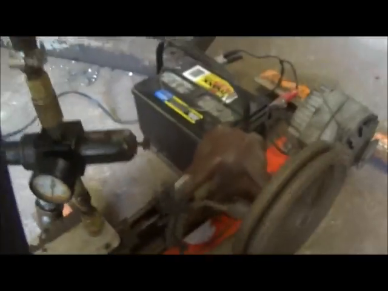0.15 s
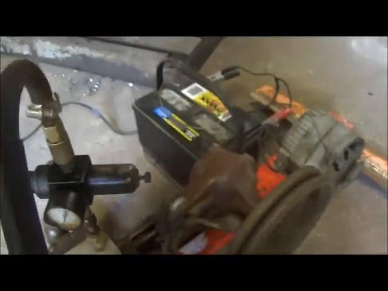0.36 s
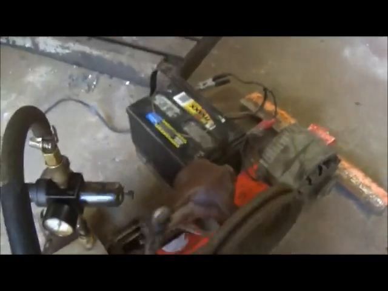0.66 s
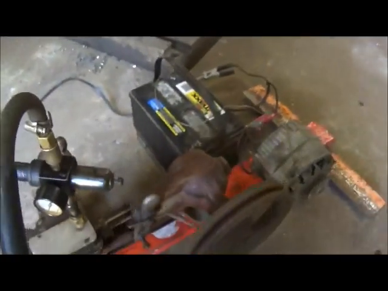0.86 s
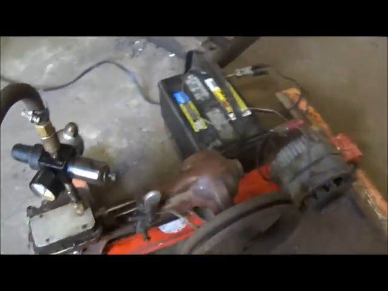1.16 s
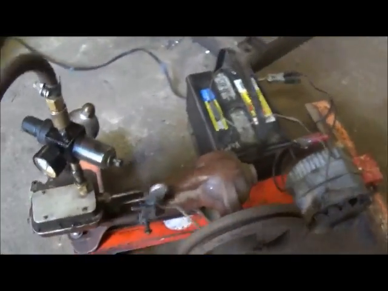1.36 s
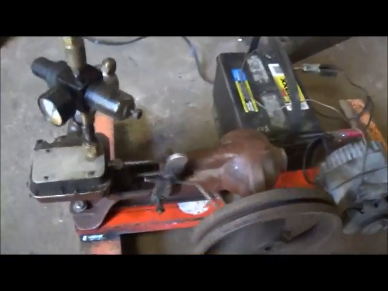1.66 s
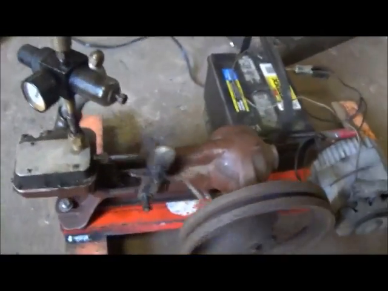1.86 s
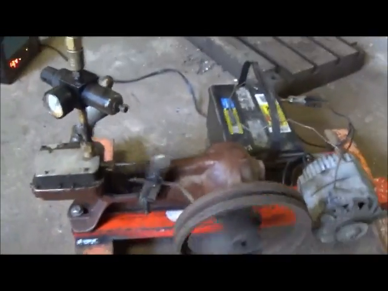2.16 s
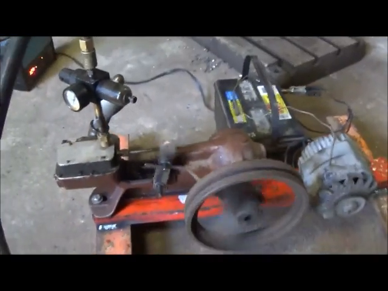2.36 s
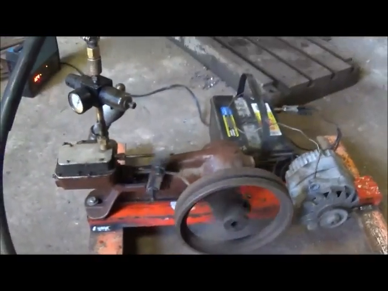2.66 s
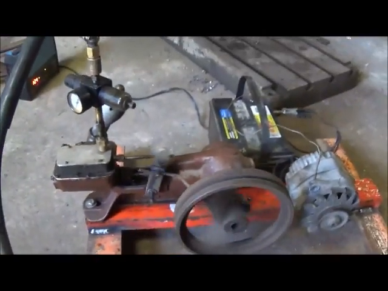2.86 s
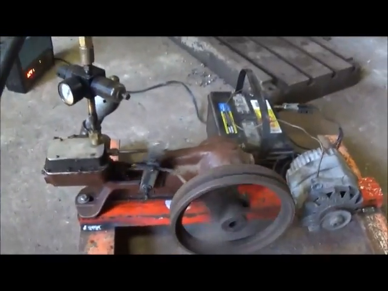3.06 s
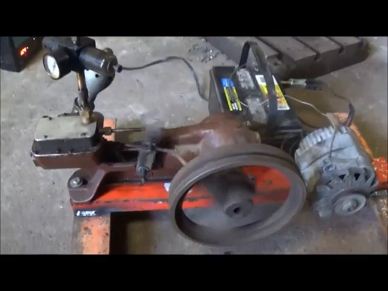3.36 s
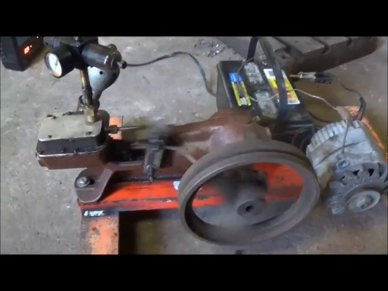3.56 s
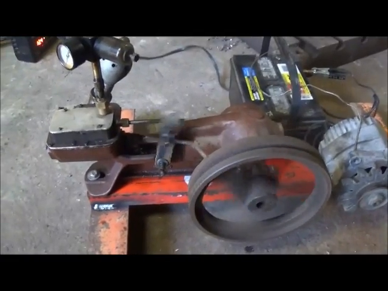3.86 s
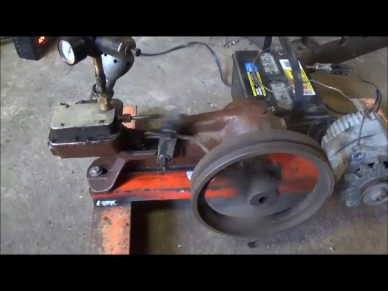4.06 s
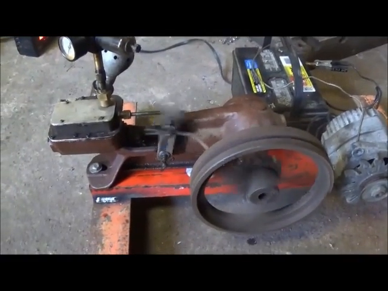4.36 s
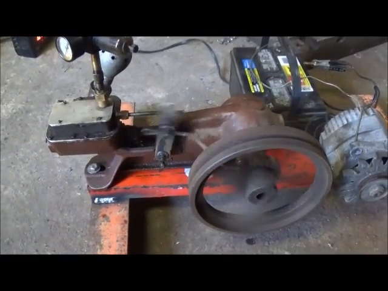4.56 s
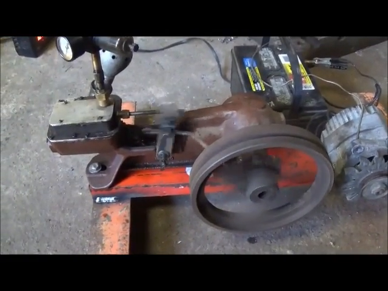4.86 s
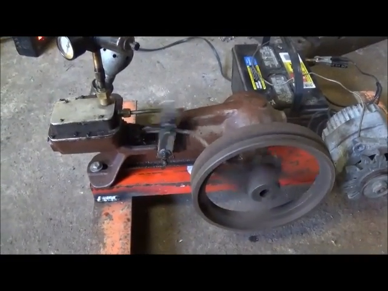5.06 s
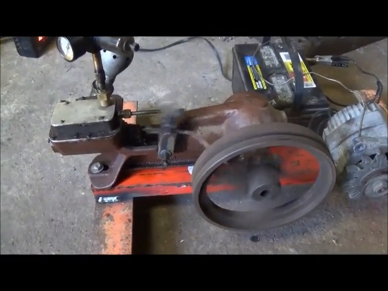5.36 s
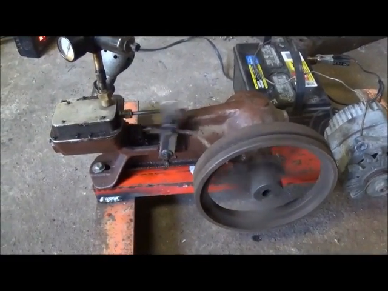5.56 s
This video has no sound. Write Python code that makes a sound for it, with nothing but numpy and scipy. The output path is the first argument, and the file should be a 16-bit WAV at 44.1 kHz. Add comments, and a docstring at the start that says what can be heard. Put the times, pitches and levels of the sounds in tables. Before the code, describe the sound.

A small air-driven piston pump is already running at the start and keeps an even pace of about ten turns a second to the end, near 5.7 seconds. Loose bearings make a rough, ringing metallic rattle; valve parts add high, wavering chirps and noisy chatter, a loose link clicks each turn, and the piston gives weak low thumps. Air escapes in bright, fluttering pulses. Hard clicks cluster in the first 1.7 seconds, then come sparsely until about 4.75. From 0.5 to 1.9 seconds the microphone favours the cylinder head, with stronger midrange clatter. Between 1.9 and 2.6 it swings toward the flywheel: the rattle falls back and throbs more deeply, while high hiss and gear notes stand out. Very faint, brief low tones occur around 2.2 to 2.6 and 4.7. Steady leak noise and a half-second workshop tail surround the close, bass-light sound, leaning left early and nearly centred later.

```python
"""A fast rattle, ticking and hissing ten times a second: a small air-driven piston pump on a workshop floor.
Loose bearings ring the modes of the casting, each turn's valve contacts shape notes and noise, a loose link
clicks, the piston thumps as damped low swings and air escapes as throbbing coloured noise.
The hand-held microphone drifts between the cylinder head and the flywheel side, ending by the flywheel;
a hard-walled shop adds a diffuse tail over a steady leak and shop noise, and a low tone sounds briefly."""
import sys
import numpy as np
from scipy import signal
from scipy.fft import rfft, irfft
from scipy.io import wavfile

SR = 44100
rng = np.random.default_rng(int(sys.argv[2]) if len(sys.argv) > 2 else 0)


def bounce(signal):
    """Save signal as a 16-bit WAV file at the path given by the first command-line argument."""
    frames = np.transpose(np.atleast_2d(signal))
    limited = np.clip(frames, -1, 1)
    pcm = np.round(limited * 32767).astype(np.int16)
    wavfile.write(sys.argv[1], SR, pcm)


def gain_from_db(level_db):
    """Turn a decibel level (scalar or array-like) into a linear amplitude factor."""
    decades = np.asarray(level_db, float) / 20
    return 10 ** decades


N = 252375

# Levels are those of each source before the final mix; "view" is 0 at the head side, 1 at the flywheel side.
# The microphone's walk: t/s, crank late on a steady beat/ms, view/1, left minus right level/dB
MIC_WALK = [(0, -0.5, 0.57, 1.5), (.45, 0, 0.3, 1.2), (1.0, 0, 0.28, 1.4), (1.9, 1.6, 0.27, 1.5),
            (2.25, 2, 0.63, 0.5), (2.6, 3.8, 0.85, 1.4), (3.3, 5, 0.87, .4), (3.8, 4, 0.85, 0),
            (4.4, 2, 0.87, 0), (5.72, 0.5, 0.9, 0.2)]
# Modes of the cast body: f/Hz, width/Hz, relative level at head side/dB, at flywheel side/dB
CASTING_MODES = [(330, 98, -23, -13), (643, 348, -8.5, -7.5), (828, 64, -19, 3), (1088, 94, 5, -0.5),
                 (1332, 470, -15.5, -3.5), (1505, 41, 2.5, -16.5), (2147, 47, -6.5, -1),
                 (2501, 67, -2, -0.5), (2905, 73, -1, 1.5), (3423, 52, -2.5, -0.5), (3746, 155, -4.5, 2),
                 (5686, 56, -19, -2.5), (5920, 134, -20.5, -6), (6736, 45, -6.5, -2)]
# Bearing rattle through one turn: angle/turns, relative level/dB
RATTLE_PATTERN = [(0, 4), (.2, 9.5), (.38, 8.5), (.47, 6.5), (.56, -6.5), (0.65, 10), (.72, 8.5),
                  (.85, 9.5), (.95, -1.5)]
# Air jet through one turn: angle/turns, relative level/dB
JET_PATTERN = [(0, 11), (.04, -6), (.2, 5.5), (.3, 1), (.42, 2.5), (.5, -2.5), (.7, 2), (.84, 3), (.87, 10),
               (.96, 1)]
# Colour of the jet: f/Hz, relative level at head side/dB, at flywheel side/dB
JET_COLOURS = [(5500, -22.5, -19), (6880, -1, -2), (7500, 2, 7.5), (8460, 5.5, 2), (9100, -5, 9.5),
               (9500, 7, 9.5), (10300, 3.5, 6.5), (12100, -7, -8)]
# Valve gear contacts, the last row the whistle of the opening port: angle/turns, rise/ms, chatter/ms, rings;
# each ring: f/Hz, width/Hz, level at head side/dB, at flywheel side/dB
GEAR_CONTACTS = [(.975, 5, 10.5, [(1840, 118, -46, -27)]), (0.149, 0.46, 1.5, [(9510, 280, -23, -12)]),
                 (.25, 0.42, 1, [(9520, 320, -11, -5)]), (.275, 2.4, 6.5, [(1755, 138.7, -37, -17)]),
                 (0.375, 0.51, 6, [(5200, 2100, -36, -17), (9500, 550, -21, -20)]),
                 (0.399, 0.2, 5.5, [(4080, 1400, -20.5, -22.5), (7120, 3800, -18, -27)]),
                 (0.437, 0.79, 2, [(9290, 300, -27, -8), (10600, 320, -10.5, -15)]),
                 (.52, 6.6, 10.5, [(8025, 310, -13, -17.5)]), (.55, 0.87, 15, [(7500, 390, -16, -27),
                 (8260, 200, -21.5, -19.5)]), (0.558, 1.1, 16.5, [(4870, 108, -37, -21),
                 (3960, 74, -30.5, -26.5), (6560, 1900, -23, -21)]),
                 (.86, 4.7, 17.5, [(8910, 310, -15, -19), (10300, 400, -25, -21.5)])]
# Hardest strikes of the loose valve link: t/s, peak level/dB
HARD_STRIKES = [(0.027, -9), (0.1263, -8.5), (0.229, -10), (0.3293, -10), (0.529, -8), (0.7289, -7),
                (1.131, -9), (1.6334, -10), (2.3422, -12), (3.2453, -10), (3.444, -11), (4.051, -10),
                (4.7502, -9)]
# Piston reversals: angle/turns, f/Hz, time to the envelope's peak and of its decay/ms, peak level/dB
PISTON_THUMPS = [(0.328, 153, 1.78, -28.5), (0.819, 126, 1.1, -35)]
# Brief low tones: start t/s, length/s, peak level/dB
LOW_TONES = [(2.21, 0.044, -30.5), (2.275, 0.045, -31), (2.60, .06, -31), (4.68, 0.096, -31)]
# Colour of the steady leak and shop noise: f/Hz, relative level per Hz/dB
SHOP_COLOUR = [(30, -30), (100, -13.5), (200, -12.5), (400, -18), (900, 1), (2000, -11), (3800, -6),
               (4500, -13.5), (9200, -6.5), (11500, -12)]

TURNS_PER_S = 9.952
RATTLE_DB, HISS_DB = (-16, -25), (-22, -22)  # level at (head side, flywheel side)
HISS_DRIFT_DB = 0.7  # slow wander of the air supply
TICK_ANGLE, TICK_JITTER_MS, TICK_DB, TICK_SCATTER_DB = .265, 1.0, -17, 3  # light strikes; angle in turns
TICK_HZ, TICK_WIDTH_HZ = 5200, 1070
LOW_TONE_HZ = 319.5
ROOM_T60_S, ROOM_DB, ROOM_LOW_HZ = .5, -11, 380
SHOP_DB = -24.5
MIC_LOW_HZ, MIC_TOP_HZ = 60, 11015


def unit(x):
    """Scale to rms 1."""
    return x / np.sqrt(np.mean(x ** 2))


def ring(x, hz, width):
    """One resonance; white noise of rms 1 comes out at rms 1."""
    return signal.lfilter(*signal.iirpeak(hz, hz / width, fs=SR), x) * np.sqrt(SR / (np.pi * width))


def ring_twice(x, hz, width):
    """The same resonance twice over, for steeper sides."""
    return ring(ring(x, hz, width), hz, width)


def low_cut(x, order, hz):
    """Thin out the bass below hz."""
    return signal.lfilter(*signal.butter(order, hz, "high", fs=SR), x)


def coloured(points):
    """Noise of rms 1 with the given (f/Hz, level/dB) colour."""
    hz, db = np.transpose(points)
    bins = np.fft.rfftfreq(N, 1 / SR) + 1
    gain = gain_from_db(np.interp(np.log(bins), np.log(hz), db))
    return unit(irfft(rfft(rng.standard_normal(N)) * gain, N))


def wobble(rate):
    """Random values drawn rate times a second and joined by straight lines."""
    count = int(N / SR * rate) + 2
    return np.interp(np.arange(N) / SR * rate, np.arange(count), rng.standard_normal(count))


def at_view(view, head, wheel):
    """Slide a value from head side to flywheel side as the microphone moves."""
    return head + view * (wheel - head)


def round_turn(turn, table):
    """Gain of an (angle, dB) pattern that repeats each turn."""
    return gain_from_db(np.interp(turn, *np.transpose(table), period=1))


def since(turn, angle, jitter_ms, scatter_db):
    """Seconds since the crank passed this angle and the strength of that pass; no two turns alike."""
    chance = rng.standard_normal((int(turn[-1]) + 4, 2))
    passes = np.floor(turn - angle + 1 / 5).astype(int)  # a pass is counted early, so jitter has room
    lateness = jitter_ms / 1000 * chance[passes + 1, 0]
    s = (turn - angle - passes) / TURNS_PER_S - lateness
    return np.maximum(s, 0), gain_from_db(scatter_db * chance[passes + 1, 1])


def casting(turn, view):
    """The uneven scrape and knock of loose bearings rings every mode of the cast body."""
    knocks = (rng.random(N) < 1500 / SR) * rng.standard_normal(N)  # about 1500 a second
    scrape = rng.standard_normal(N)
    throb = round_turn(turn, RATTLE_PATTERN) ** (0.68 + .5 * view)  # deeper by the flywheel
    drive = unit(0.62 * unit(knocks) + scrape) * throb
    body = 0
    for hz, width, head_db, wheel_db in CASTING_MODES:
        # each mode is fed by its own spot of the bearing, so it flickers alone
        share = gain_from_db(at_view(view, head_db, wheel_db) + 1.73 * wobble(40))
        mode = unit(ring(ring(drive, hz, width), hz, 8 * width))
        body = body + share * np.sqrt(width) * mode
    return unit(body)


def jet(turn, view):
    """Air escapes hardest as the port opens, and flutters; its colour turns with the view."""
    colours = np.array(JET_COLOURS)
    head, wheel = coloured(colours[:, [0, 1]]), coloured(colours[:, [0, 2]])
    air = np.sqrt(1 - view) * head + np.sqrt(view) * wheel
    flutter = gain_from_db(2.1 * wobble(70))
    return unit(air * round_turn(turn, JET_PATTERN) * flutter)


def gear(turn, view):
    """Each contact chatters for some milliseconds; small parts answer with a wavering note, large with noise."""
    out = 0
    for angle, rise_ms, chatter_ms, rings in GEAR_CONTACTS:
        s, size = since(turn, angle, jitter_ms=0.72, scatter_db=2.0)
        rise = 1 - np.exp(-(s * 1000 / rise_ms) ** 2)
        chatter = size * rise * np.exp(-(s * 1000 / chatter_ms) ** 1.42)
        for hz, width, head_db, wheel_db in rings:
            pitch = hz * (1 + .006 * wobble(TURNS_PER_S)) + 0.49 * width * wobble(300)
            note = np.sin(2 * np.pi * np.cumsum(pitch) / SR)
            noise = unit(ring_twice(rng.standard_normal(N), hz, 1.04 * width))
            clean = np.clip(1.1 - width / 900, 0, 1)  # narrow rings are mostly note
            sound = np.sqrt(2 * clean) * note + np.sqrt(1 - clean) * noise
            out = out + gain_from_db(at_view(view, head_db, wheel_db)) * chatter * sound
    return out


def link(turn):
    """The loose valve link strikes once a turn, mostly light and now and then hard, with a very short ring."""
    at = np.flatnonzero(np.diff(np.floor(turn - TICK_ANGLE)))
    chance = rng.standard_normal((len(at), 2))
    at = np.clip(at + TICK_JITTER_MS / 1000 * SR * chance[:, 0], 0, N - 1).astype(int)
    hard_s, hard_db = np.transpose(HARD_STRIKES)
    # a light strike gives way to a hard one within half a turn
    light = np.abs(at[:, None] / SR - hard_s).min(axis=1) > .5 / TURNS_PER_S
    strikes = np.zeros(N)
    strikes[at] = light * gain_from_db(TICK_DB + TICK_SCATTER_DB * chance[:, 1])
    strikes[(hard_s * SR).astype(int)] = gain_from_db(hard_db)
    impulse = np.eye(1, SR // 100)[0]
    click = ring_twice(impulse, TICK_HZ, TICK_WIDTH_HZ)
    return signal.fftconvolve(strikes, click / np.abs(click).max())[:N]


def piston(turn):
    """One damped low swing of the frame at each end of the stroke."""
    out = 0
    for angle, hz, decay_ms, peak_db in PISTON_THUMPS:
        s, size = since(turn, angle, jitter_ms=0.6, scatter_db=2.0)
        rise = s * 1000 / decay_ms
        envelope = rise * np.exp(1 - rise)
        out = out + gain_from_db(peak_db) * size * envelope * np.sin(2 * np.pi * hz * s)
    return out


def low_tones(t):
    """A low sine that swells and fades smoothly a few times."""
    swell = 0
    for start_s, length_s, peak_db in LOW_TONES:
        progress = np.clip((t - start_s) / length_s, 0, 1)
        swell = swell + gain_from_db(peak_db) * np.sin(np.pi * progress) ** 2
    return swell * np.sin(2 * np.pi * LOW_TONE_HZ * t)


def room(x):
    """Diffuse tail of a hard-walled shop, different at each ear; the bass stays mostly direct."""
    s = np.arange(int(ROOM_T60_S * SR)) / SR
    late = s > .004  # the tail waits for 4 ms
    tail = rng.standard_normal((2, len(s))) * late * gain_from_db(-60 * s / ROOM_T60_S)
    tail = tail / np.sqrt(np.sum(tail ** 2, axis=1, keepdims=True))
    tail = low_cut(tail, 1, ROOM_LOW_HZ)
    return signal.fftconvolve(x[None], tail, axes=1)[:, :N]


def shop_noise():
    """Steady leak and shop noise: a centred layer plus a thinner one of opposite sign left and right."""
    wide = low_cut(coloured(SHOP_COLOUR), 1, ROOM_LOW_HZ)
    return gain_from_db(SHOP_DB) * (coloured(SHOP_COLOUR) + 0.33 * wide * np.array([[1], [-1]]))


def scene():
    """The pump as the microphone walks, its echo in the shop and a steady background."""
    t = np.arange(N) / SR
    walk_s, *walk = np.transpose(MIC_WALK)
    late_ms, view, pan_db = (np.interp(t, walk_s, column) for column in walk)
    view = np.clip(view, 0, 1)
    turn = TURNS_PER_S * (t - late_ms / 1000)
    rattle = gain_from_db(at_view(view, *RATTLE_DB)) * casting(turn, view)
    hiss = gain_from_db(at_view(view, *HISS_DB) + HISS_DRIFT_DB * wobble(1.47)) * jet(turn, view)
    pump = rattle + hiss + gear(turn, view) + link(turn) + piston(turn) + low_tones(t)
    direct = pump * gain_from_db(np.array([pan_db, -pan_db]) / 2)
    return gain_from_db(-1.5) * (direct + gain_from_db(ROOM_DB) * room(pump)) + shop_noise()


def low_pass(x):
    """Removes everything above the highest recorded frequency."""
    return signal.sosfilt(signal.butter(12, 12000, fs=SR, output="sos"), x)


def record(dry):
    """The small microphone loses the deep bass, rounds the peaks and cuts the top steeply."""
    thin = low_cut(dry, 2, MIC_LOW_HZ)
    soft = np.tanh(1.676 * thin) / 1.518
    steep = signal.ellip(12, .3, 58, MIC_TOP_HZ, fs=SR, output="sos")  # .3 dB ripple, 58 dB down
    cut = signal.sosfilt(steep, soft)
    return low_pass(cut)


dry = scene()
out = record(dry)
bounce(out)
```